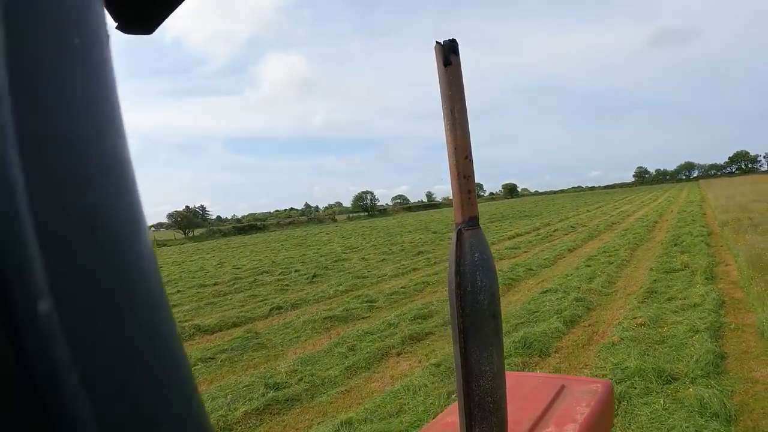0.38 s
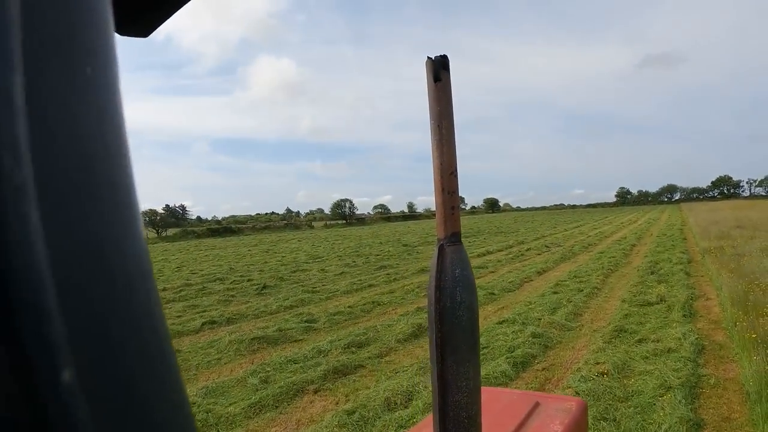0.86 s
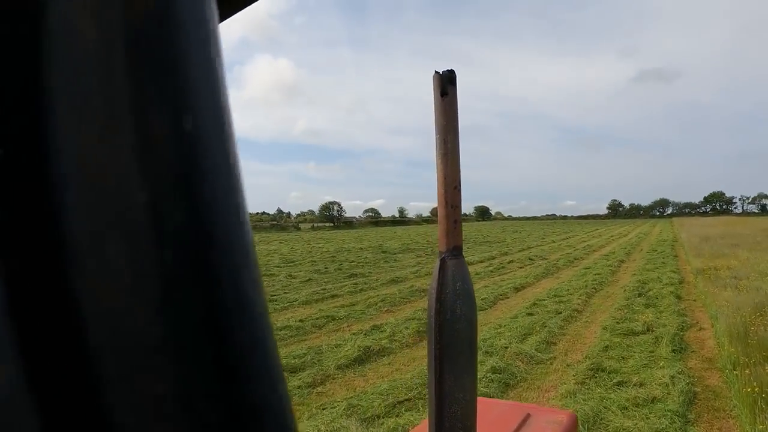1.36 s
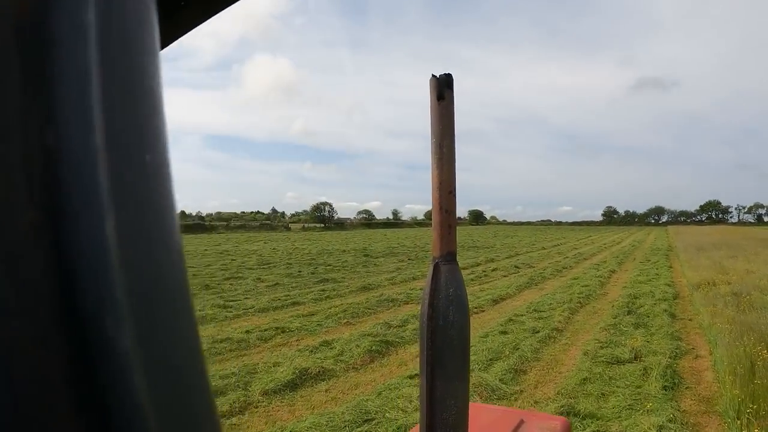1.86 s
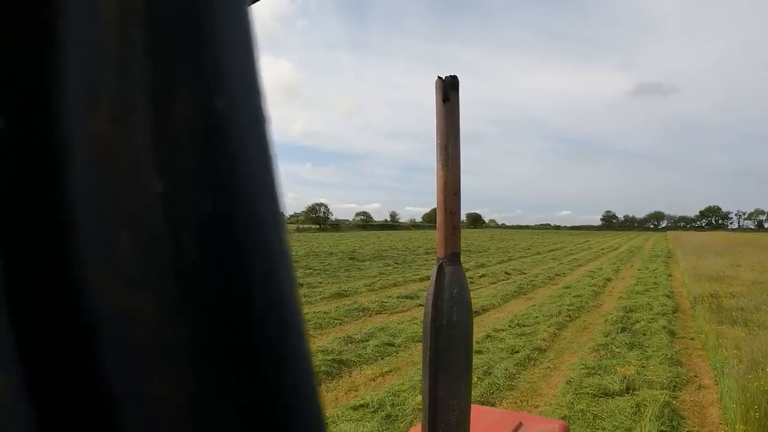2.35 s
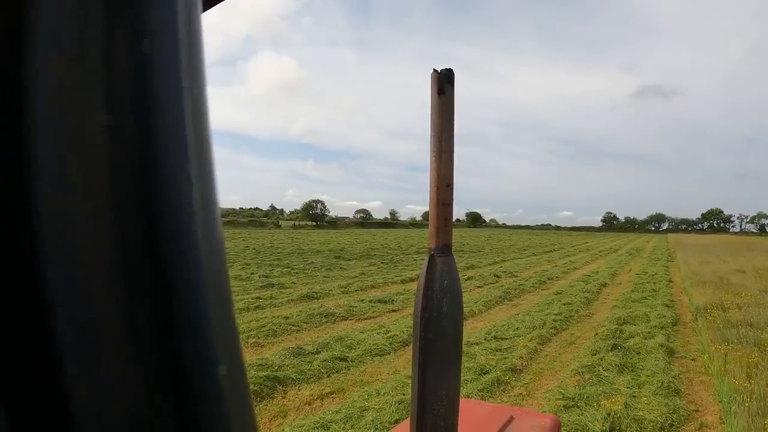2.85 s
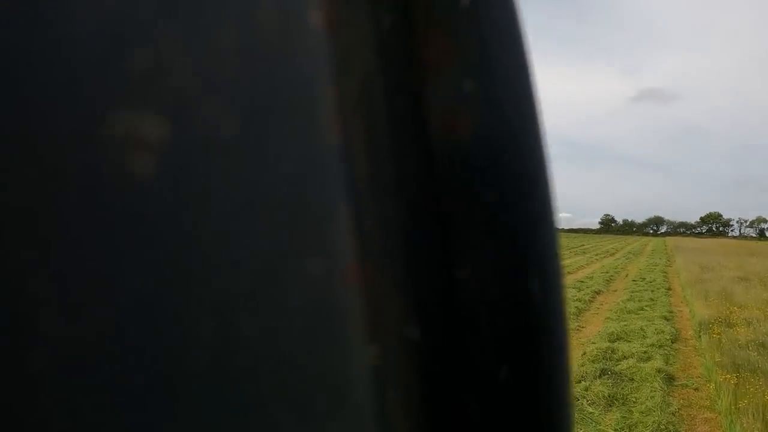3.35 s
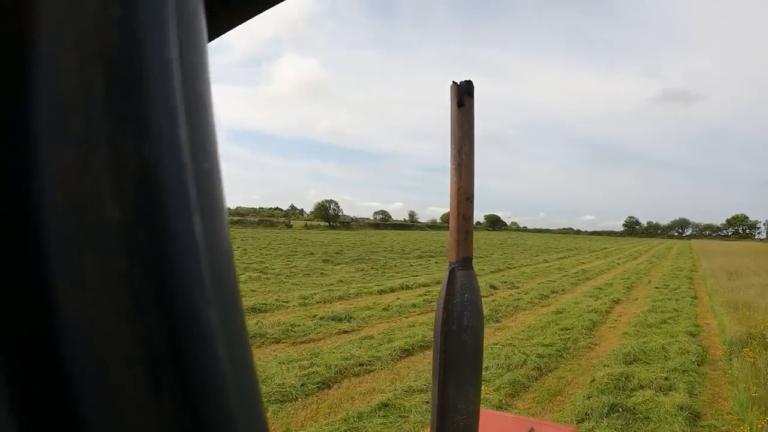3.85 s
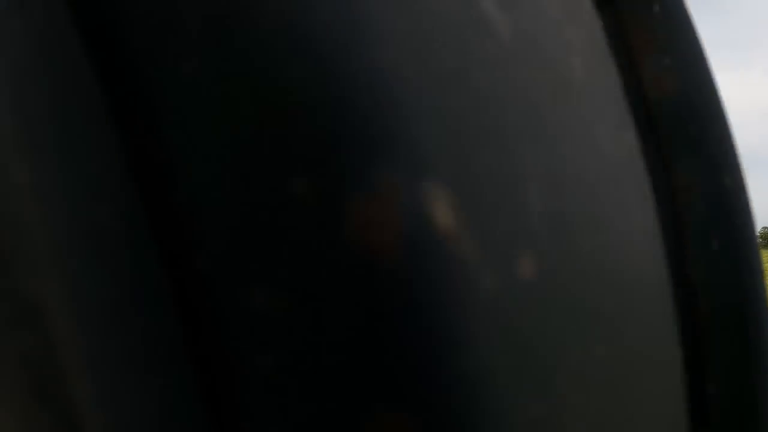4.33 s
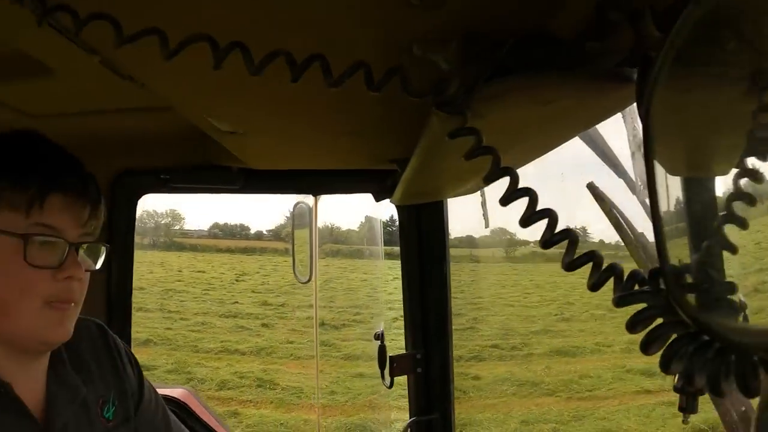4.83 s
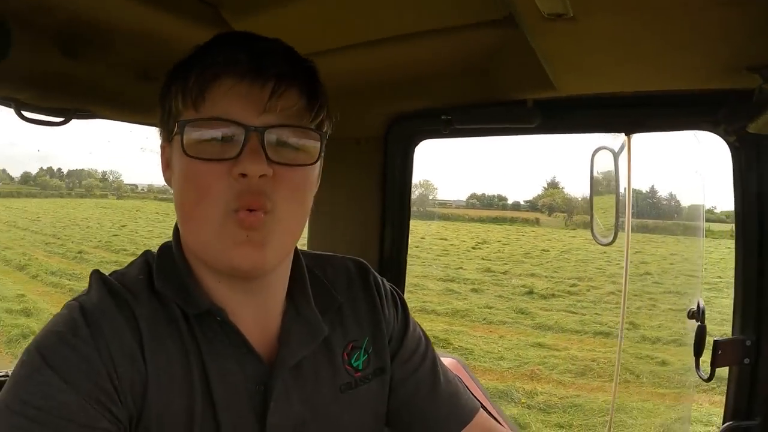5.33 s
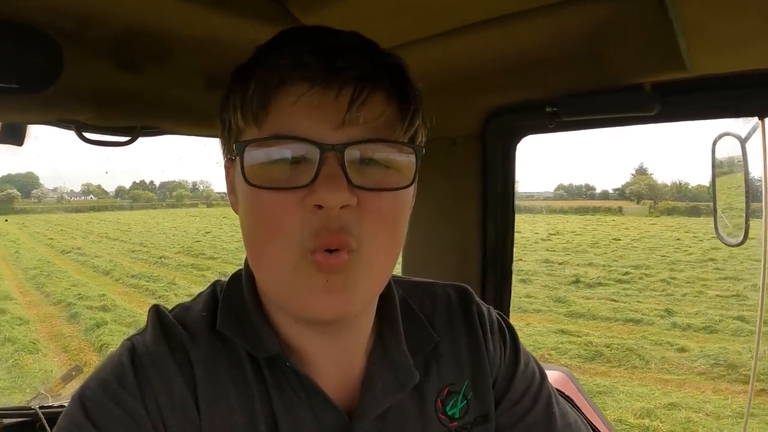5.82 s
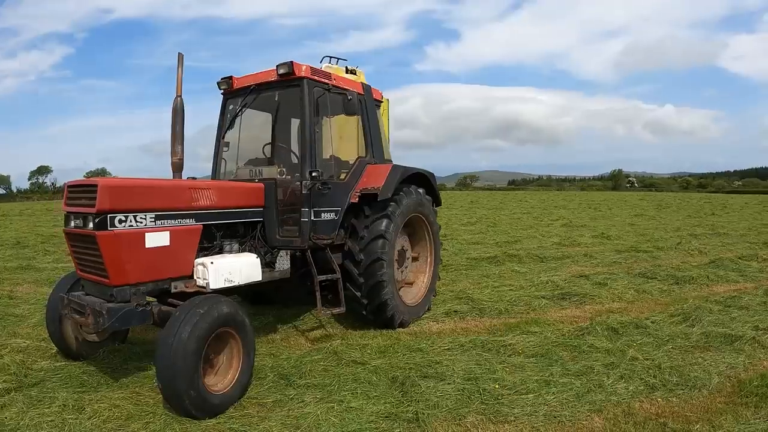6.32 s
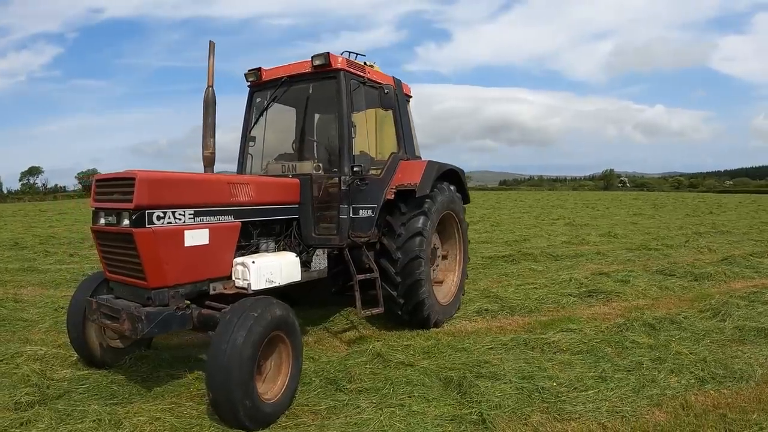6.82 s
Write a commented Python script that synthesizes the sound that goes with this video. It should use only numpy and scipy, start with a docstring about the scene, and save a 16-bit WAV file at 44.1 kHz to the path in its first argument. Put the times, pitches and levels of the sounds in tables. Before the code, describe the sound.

Outdoors in a hayfield, a loaded diesel drones hard and steady near the microphone, with rasping roar, metallic clatter and short airy exhaust whistles. A quick thump interrupts midway. Moving inside the tractor cab takes off the edge, leaving muffled roar and pulsing low mower hum. A sudden cut gives a moment of silence, then a quiet lumpy idle rises, heard from outside with light ticking.

```python
"""The firing boom, roar and stack whistle of a six-cylinder diesel tractor, driving a disc mower near 1810 rpm.
The microphone starts at the cab door near the stack, bumps the door frame, then swings into the cab, where
the stack dulls and the mower drones. Sines follow the shafts; noise flaring at each firing, shaped by
spectra and resonances, gives roar, clatter, hiss and whistle. The sound cuts to silence, then the same engine
fades in at idle, heard from outside: firing-timed noise, wavering low and middle sines, ringing valve ticks."""
import sys
import numpy as np
from scipy import signal
from scipy.fft import rfft, irfft, next_fast_len
from scipy.io import wavfile
from scipy.ndimage import uniform_filter1d, minimum_filter1d, map_coordinates

SR = 44100
rng = np.random.default_rng(int(sys.argv[2]) if len(sys.argv) > 2 else 0)


def dump_mix(stems):
    """Bounce the given channels to the path in sys.argv[1] as a 16-bit WAV at rate SR."""
    frames = np.atleast_2d(stems).T  # one column per channel
    limited = np.clip(frames, -1, 1)  # hard clip at full scale
    pcm = np.round(limited * 32767).astype(np.int16)
    wavfile.write(sys.argv[1], SR, pcm)


def voltage_ratio(level):
    """Linear amplitude factor for a level in decibels (scalar or array-like)."""
    return 10 ** (np.asarray(level, float) / 20)


N = 305783

# crank speed: t/s, speed/rpm
CRANK_SPEED = [(0.0, 1837.0), (0.4, 1823.9), (0.8, 1814.7), (1.2, 1813.2), (1.6, 1806.9), (2.0, 1805.8),
               (2.4, 1796.7), (2.8, 1808.7), (3.2, 1813.5), (3.6, 1819.4), (4.0, 1816.1), (4.4, 1822.7),
               (4.8, 1804.3), (5.2, 1816.2), (5.6, 1807.9), (6.2, 1813.2)]
# firing tone: t/s, rms level/dB
FIRING_LEVEL = [(0.2, -12), (1.0, -12.5), (3.9, -13), (4.6, -13.5), (5.2, -17), (5.8, -28.5), (6.0, -31)]
# way into the cab: t/s, cab share of the engine sounds/1, cab share of the mower drone/1 (may pass 1)
INSIDE_SHARE = [(4.2, 0.05, 0.14), (4.5, 0.1, .35), (4.75, 0.36, 0.46), (5.0, 0.37, 0.46),
                (5.4, 0.95, 0.67), (5.8, 0.96, 1.13), (6.2, 0.86, 1.26)]
# cab hiding the stack: t/s, share/1
STACK_SHADOW = [(4.17, 0.04), (4.35, 0.38), (4.55, 0.53), (4.75, 0.66), (5.0, 0.88), (5.5, 0.91),
                (6.0, 1.03), (6.18, 1)]
# multiples of the four-stroke cycle, then of the disc speed: order/1, door rms level/dB, cab rms level/dB
CYCLE_ORDERS = [(2, -50, -34), (4, -48, -38), (7, -43, -41), (8, -37, -36), (9, -43, -33), (10, -37, -28),
                (11, -46, -39), (12, -39, -31), (14, -38, -33), (15, -37, -35), (16, -42, -43),
                (18, -33.5, -46), (20, -33, -42), (21, -40, -42), (24, -36, -48), (26, -42, -46),
                (27, -41, -42), (28, -42, -44), (30, -35.5, -45), (32, -36, -49), (34, -36, -48),
                (36, -38, -47), (38, -46, -57), (40, -37, -52), (44, -47, -48), (45, -47, -43),
                (46, -50, -45), (52, -50, -46), (56, -47, -44), (60, -44, -54), (68, -55, -47),
                (75, -55, -46), (78, -55, -46)]
MOWER_ORDERS = [(1, -36, -22), (2, -36, -29), (8, -37, -39), (10, -38, -50), (14, -44, -42), (16, -44, -52)]
# orders swelling as the microphone crosses the cab's standing waves: order/1, t/s, half length/s, gain/dB
CYCLE_SWELLS = [(10, 5.62, .15, 3), (14, 5.95, .2, 5), (20, 4.95, .2, 4), (40, 5.05, .12, 7),
                (56, 5.52, .2, 11)]
MOWER_SWELLS = [(8, 5.25, .12, 4), (14, 5.85, .1, 4), (16, 4.85, .18, 11)]
# strength of each cylinder in firing order, in the exhaust and at the rim: level/dB
CYLINDERS_DB = [-4.5, -4, -4, -3.5, -5, -3.5]
RIM_CYLINDERS_DB = [-4.5, -6, -7, -2, -3.5, -3.5]
# noise spectra, door and cab: f/Hz, level/dB
ROAR_DOOR = [(10, -23), (28, -10), (60, -8), (120, -3.5), (330, -3), (430, -3.5), (520, 2.5), (575, -1.5),
             (620, -1.5), (720, -6.5), (850, -5), (1100, -7), (1300, -9), (1580, -7), (1720, -24),
             (2200, -25), (3500, -68.5)]
ROAR_CAB = [(10, -14), (28, -7.5), (75, -3.5), (130, -3), (220, -2.5), (400, -6), (600, -12), (720, -8),
            (800, -9.5), (1050, -13.5), (1250, -9.5), (1700, -19.5), (2200, -26.5), (3500, -63)]
CLATTER_DOOR = [(1000, -11), (1700, 1.5), (2190, -2.5), (2740, -0.5), (4200, -9.5), (4680, -12),
                (5530, -9.5), (6200, -31), (8060, -40), (13600, -120)]
CLATTER_CAB = [(1000, -34.5), (1700, -7), (2190, -14.5), (3290, -13.5), (4550, -16), (5500, -13),
               (6200, -20.5), (8060, -27), (13600, -120)]
COMBUSTION_TICKS = [(1000, -39), (1900, -8), (2900, -4), (3600, -1.5), (4600, -3), (5400, -18), (8000, -50)]
JET_HISS = [(3590, -32.5), (6100, -2), (6400, -1), (8300, -1), (10000, -14), (13000, -48), (22000, -120)]
SIZZLE_DOOR = [(5880, -23.5), (10000, -4), (12300, 2), (13400, -3.5), (14400, -7), (15800, -26)]
SIZZLE_CAB = [(5590, -25), (9500, -2), (10200, -19), (10900, -3.5), (12300, 6.5), (13600, 4.5), (14600, -4),
              (15800, -15.5)]
# resonances of the stack's rim: f/Hz, width/Hz, level/dB
RIM_MODES = [(5144, 40, -1), (5476, 130, -1), (5784, 180, 1.5)]
# whistle swells: start/s, length/s, level at the start before the rise/dB
WHISTLE_SWELLS = [(0.0, 0.19, -1.5), (0.211, 0.22, 3.5), (.48, 0.039, 0.5), (.63, 0.38, 2.5),
                  (1.017, 0.12, -0.5), (1.309, 0.18, -0.5), (1.523, 0.13, 0), (1.715, 0.23, 1),
                  (1.96, 0.22, -12), (2.183, 0.14, 0), (2.432, 0.074, -0.5), (2.544, 0.39, 0.5),
                  (2.946, 0.05, -7), (3.21, 0.3, -1.5), (3.56, 0.12, 0.5), (3.74, 0.2, -4),
                  (4.045, 0.036, -4.5), (4.25, 0.2, -13), (4.46, .04, -4), (4.527, 0.046, -2),
                  (4.746, 0.31, -0.5), (5.11, .05, -1.5), (5.186, 0.07, 1.5), (5.29, .06, -3.5),
                  (5.396, 0.3, 2), (5.984, 0.055, -6)]
# noise layers: level in plain view of the stack/dB, change in full shadow/dB, further change in the cab/dB
ROAR_LEVEL = (-22, -2.5, 0)
CLATTER_LEVEL = (-30.5, -10, -0.5)
JET_LEVEL = (-42, -12.5, -4.5)
SIZZLE_LEVEL = (-55.5, -15.5, 5.5)
WHISTLE_LEVEL = (-37.5, -5.5, -4)
# hollow band as the microphone turns by the door pillar: start/s, length/s, from f/Hz, to f/Hz, depth/dB
PILLAR_SWEEPS = [(.4, 1.2, 4720, 5300, 5.5), (2.2, 1, 6400, 6130, 10), (4.02, 0.8, 3600, 6300, 8),
                 (4.05, 1.3, 10000, 10300, 7), (4.2, .5, 11200, 11300, 5)]
# a sine that briefly dips the firing boom, then thumps of the door frame:
# t/s, decay level at the start before the onset ramp/dB, f/Hz, t60/s
BUMP_SINES = [(3.4328, -8, 88, .036), (3.4433, 9, 280, .014), (3.446, -13, 45, .06)]
# contact noise driving the frame: t/s, level before onset ramp and resonances/dB
FRAME_CONTACTS = [(3.421, -20), (3.429, -20), (3.435, -19), (3.4408, -2.5), (3.649, -21), (3.672, -25)]
# frame resonances, applied twice: f/Hz, width/Hz, level per pass/dB
FRAME_MODES = [(1700, 1800, 0), (3400, 1200, -3), (4800, 800, 0), (8000, 2500, -15), (12300, 2400, -11)]
# idle noise spectra: f/Hz, level/dB
IDLE_THUD = [(12, -26.5), (25, -9), (60, 0.5), (110, -3), (170, -4.5), (230, -7.5), (300, -13.5),
             (500, -73.5)]
IDLE_BODY = [(180, -45), (300, -12), (562, -13.5), (633, -8), (680, -13.5), (747, -7), (897, -16),
             (1090, -17), (1160, -11), (1250, -13), (1800, -24), (2000, -21), (2600, -41), (4400, -120)]
IDLE_CLATTER = [(1120, -32), (1900, -8), (2720, 0.5), (4880, -11.5), (5540, -13.5), (6710, -21),
                (8000, -25), (8990, -35), (12100, -38), (14000, -60)]
# idle low and middle sines: f/Hz, level over the thud layer/dB
IDLE_TONES = [(42.6, -7), (58.5, -17), (69, -8.5), (116, -15), (174, -12.5), (231, -19), (275, -24),
              (452, -24), (635, -24), (732, -20.5), (764, -24), (1168, -29)]
# idle layers: level once faded in/dB, growth/dB per s, steepness of the fade/1
THUD_LEVEL = (-25.5, 0, 4.5)
BODY_LEVEL = (-37, 13.5, 4)
IDLE_CLATTER_LEVEL = (-47.5, 12.5, 4.5)
# valve gear resonances, applied twice: f/Hz, width/Hz, level per pass/dB
ROCKER_MODES = [(5670, 220, 3), (10470, 300, -8)]
TAPPET_MODES = [(7150, 260, -0.5), (7830, 300, -4), (8700, 220, -6)]
# louder valve ticks: t/s, rocker drive/dB, tappet drive/dB (before onset ramp and resonances)
VALVE_TICKS = [(6.452, -52, -52), (6.482, -47, -45), (6.541, -47, -47), (6.57, -45, -46), (6.598, -44, -39),
               (6.627, -39, -43), (6.657, -40, -35), (6.686, -42, -40), (6.712, -29.5, -36),
               (6.742, -34, -42), (6.769, -37, -25), (6.8, -34, -38), (6.826, -36, -26), (6.857, -40, -42),
               (6.883, -31.5, -29), (6.912, -35, -40)]

DISC_TURNS_PER_CYCLE = 3.351
FIRING_START_FIRINGS, DISC_START_TURNS, PUFF_LAG_CYCLES = .45, .585, .623
CUT_S, IDLE_FADE_START_S, IDLE_FADE_TAU_S = 6.1853, 6.374, .046
IDLE_FIRING_HZ, IDLE_FIRING_START_S = 35.16, 6.4295
TIME_S = np.arange(N) / SR


def unit(x):
    """x scaled to rms 1."""
    return x / np.sqrt(np.mean(x ** 2) + 1e-20)


def curves(rows):
    """One value per sample for each column after the time."""
    s, *cols = np.transpose(rows)
    return [np.interp(TIME_S, s, c) for c in cols]


def wobble(rate_hz):
    """Smooth random curve, rate_hz knots per second."""
    knots = rng.standard_normal(int(N * rate_hz / SR) + 4)
    return map_coordinates(knots, [TIME_S * rate_hz])


def filtered(x, response):
    """x times a complex response of frequency in Hz."""
    m = next_fast_len(N + SR // 4)
    return irfft(rfft(x, m) * response(np.fft.rfftfreq(m, 1 / SR)), m)[:N]


def coloured(x, spectrum):
    """x shaped by a spectrum interpolated on a log frequency axis, rms 1."""
    f, db = np.transpose(spectrum)
    return unit(filtered(x, lambda hz: voltage_ratio(np.interp(np.log(hz + 1), np.log(f + 1), db))))


def resonant(x, modes):
    """x through parallel second-order resonances."""
    return filtered(x, lambda f: sum(voltage_ratio(db) * 1j * f * w / (c * c - f * f + 1j * f * w)
                                     for c, w, db in modes))


def patchy(patch_db):
    """White noise with patches of random gain in time and frequency."""
    z = signal.stft(rng.standard_normal(N), nperseg=512)[2]
    field = uniform_filter1d(rng.standard_normal(z.shape), 6, 0)
    field = uniform_filter1d(field, 14, 1)
    return signal.istft(z * voltage_ratio(patch_db * unit(field)), nperseg=512)[1][:N]


def bursts(firings, sharp, scatter_db, pattern_db=(0,)):
    """Noise flaring at each whole firing, each flare of its own size."""
    n = np.floor(firings + .5).astype(int)
    size_db = np.take(pattern_db, n, mode="wrap") + scatter_db * rng.standard_normal(2048)[n % 2048]
    return voltage_ratio(size_db) * np.exp(sharp * np.cos(2 * np.pi * firings)) * patchy(patch_db=1)


def tones(orders, swells, turns, inside, scatter_turns, waver_db, drift_turns):
    """Sines on shaft multiples, wavering in level; phase drift grows with order."""
    out = np.zeros(N)
    for k, door_db, cab_db in orders:
        level_db = door_db + (cab_db - door_db) * inside + waver_db * wobble(7)
        for order, s, half_s, db in swells:
            if order == k:
                level_db = level_db + db * np.exp(-((TIME_S - s) / half_s) ** 2)
        phase = k * turns + scatter_turns * rng.standard_normal() + drift_turns * k * wobble(9)
        out += np.sqrt(2) * voltage_ratio(level_db) * np.sin(2 * np.pi * phase)
    return out


def heard_db(layer, view, sway_db):
    """Layer level by shadow and cab, swaying partly in common with the other layers."""
    shadow, inside, unsteady = view
    plain_db, shadow_db, cab_db = layer
    return plain_db + shadow_db * shadow + cab_db * inside + sway_db * (.29 * unsteady + wobble(2.975))


def crossfade(inside):
    """Equal-power door and cab gains."""
    return np.sqrt(np.clip(1 - inside, 0, 1)), np.sqrt(np.clip(inside, 0, 1))


def mower(cycles, drone):
    """Discs geared to the engine drone on multiples of their speed."""
    turns = DISC_TURNS_PER_CYCLE * cycles + DISC_START_TURNS
    return tones(MOWER_ORDERS, MOWER_SWELLS, turns, drone, scatter_turns=.01, waver_db=1.2, drift_turns=.012)


def bump():
    """A brief dip in the firing boom, then frame thumps, as decaying sines; contact noise rings the frame."""
    out, tick, t = np.zeros(N), np.zeros(N), np.arange(SR // 10) / SR
    for s, db, hz, t60_s in BUMP_SINES:  # the first opposes the boom
        sine = voltage_ratio(db - 60 * t / t60_s) * np.sin(2 * np.pi * hz * t) * (1 - np.exp(-t / .0008))
        out[round(s * SR):][:len(t)] += sine
    for s, db in FRAME_CONTACTS:  # a new contact replaces the tail of the last
        decay = voltage_ratio(db - 60 * t / .012) * (1 - np.exp(-t / .0012))
        tick[round(s * SR):][:len(t)] = decay * rng.standard_normal(len(t))
    return out + resonant(resonant(tick, FRAME_MODES), FRAME_MODES)


def valve_ticks():
    """Short noise knocks ring the rockers and tappets, plus a faint broad treble snap."""
    taps, t = np.zeros((2, N + SR)), np.arange(SR // 40) / SR
    for s, *db in VALVE_TICKS:
        decay = voltage_ratio(np.c_[db] - 60 * t / .068) * (1 - np.exp(-t / .0012))
        taps[:, round(s * SR):][:, :len(t)] += decay * rng.standard_normal(len(t))
    rocker, tappet = taps[:, :N]
    snap = voltage_ratio(-25) * filtered(rocker + tappet, lambda hz: np.exp(-((hz - 9000) / 3600) ** 4))
    return (snap + resonant(resonant(rocker, ROCKER_MODES), ROCKER_MODES)
            + resonant(resonant(tappet, TAPPET_MODES), TAPPET_MODES))


def idling():
    """Slow firings drive a rough thud, body and clatter; low and middle sines waver and valves tick."""
    firings = (TIME_S - IDLE_FIRING_START_S) * IDLE_FIRING_HZ
    since_s = np.maximum(TIME_S - IDLE_FADE_START_S, 0)
    fade_db = 20 * np.log10(1 - np.exp(-since_s / IDLE_FADE_TAU_S) + 1e-6)
    thud_gain, body_gain, clatter_gain = (
        voltage_ratio(db + growth * since_s + steepness * fade_db)
        for db, growth, steepness in (THUD_LEVEL, BODY_LEVEL, IDLE_CLATTER_LEVEL))
    thud = voltage_ratio(-2) * coloured(bursts(firings - .3, sharp=.2, scatter_db=1.5), IDLE_THUD)
    hum = np.zeros(N)
    for hz, db in IDLE_TONES:
        phase = hz / IDLE_FIRING_HZ * firings + rng.random()
        hum += np.sqrt(2) * voltage_ratio(db + 2.9 * wobble(14)) * np.cos(2 * np.pi * phase)
    body = coloured(bursts(firings - .2, sharp=.12, scatter_db=.5), IDLE_BODY)
    clatter = coloured(bursts(firings, sharp=.32, scatter_db=1), IDLE_CLATTER)
    return thud_gain * (thud + hum) + body_gain * body + clatter_gain * clatter + valve_ticks()


def clattering(firings, view):
    """Knock and sharper combustion ticks at the door; blunter clatter in the cab."""
    door, cab = crossfade(view[1])
    late = firings - .59
    knock = coloured(bursts(late, sharp=.18, scatter_db=.6), CLATTER_DOOR)
    ticks = voltage_ratio(-10) * coloured(bursts(late, sharp=1.3, scatter_db=2.5), COMBUSTION_TICKS)
    dull = coloured(bursts(firings, sharp=.15, scatter_db=.9), CLATTER_CAB)
    return voltage_ratio(heard_db(CLATTER_LEVEL, view, sway_db=.3)) * (door * (knock + ticks) + cab * dull)


def stack_hiss(firings, view):
    """Gas leaving the stack hisses about a quarter firing after each pressure peak."""
    door, cab = crossfade(view[1])
    # the highest treble dips for a while after the bump
    dip = np.sqrt(np.abs(np.sin(np.pi * np.clip((TIME_S - 3.45) / .74, 0, 1))))
    jet_db = heard_db(JET_LEVEL, view, sway_db=2.3) - 3 * dip
    sizzle_db = heard_db(SIZZLE_LEVEL, view, sway_db=-1.5) - 6.5 * dip
    jet = bursts(firings - .51, sharp=.41, scatter_db=.5, pattern_db=CYLINDERS_DB)
    sizzle = door * coloured(jet, SIZZLE_DOOR) + cab * coloured(jet, SIZZLE_CAB)
    return voltage_ratio(jet_db) * coloured(jet, JET_HISS) + voltage_ratio(sizzle_db) * sizzle


def hollowed(x, width_hz):
    """x with sweeping bands cut, each starting slowly and deepest midway, and a broad lift above."""
    hz, t, z = signal.stft(x, SR, nperseg=512)
    hz, loss_db = hz[:, None], 0
    for s, length_s, from_hz, to_hz, depth_db in PILLAR_SWEEPS:
        u = np.clip((t - s) / length_s, 0, 1)
        centre_hz = from_hz + (to_hz - from_hz) * u ** 2
        hollow = np.exp(-((hz - centre_hz) / width_hz) ** 2)
        lift = .2 * np.exp(-((hz / centre_hz - 1.1) / .19) ** 2)
        loss_db = loss_db + depth_db * np.sqrt(np.abs(np.sin(np.pi * u))) * (hollow - lift)
    return signal.istft(z * voltage_ratio(-loss_db), SR, nperseg=512)[1][:N]


def whistle_swelling():
    """Whistle gain: quick swells that sag and die away over a lull."""
    rise_tau_s, fall_tau_s, sag_db_per_s, lull_db = .013, .027, 17, -9
    gain = np.full(N, voltage_ratio(lull_db))
    for s, length_s, db in WHISTLE_SWELLS:
        u = TIME_S - s
        rise = 1 - np.exp(-np.maximum(u, 0) / rise_tau_s)
        fall = np.exp(-np.maximum(u - length_s, 0) / fall_tau_s)
        gain += voltage_ratio(db - sag_db_per_s * np.clip(u, 0, 1)) * rise * fall
    return gain


def stack_whistle(firings, view):
    """Puffs across the stack's rim, near each pressure peak, ring its resonances."""
    puffs = bursts(firings - .22, sharp=.93, scatter_db=2, pattern_db=RIM_CYLINDERS_DB)
    ringing = unit(resonant(resonant(puffs, RIM_MODES), [(5350, 650, 0)]))
    return voltage_ratio(heard_db(WHISTLE_LEVEL, view, sway_db=.55)) * whistle_swelling() * ringing


def exhaust_roar(firings, view):
    """Each stroke roars with its cylinder's strength at the door; steady noise in the cab."""
    door, cab = crossfade(view[1])
    strokes = bursts(firings - .7, sharp=.09, scatter_db=1.1, pattern_db=CYLINDERS_DB)
    roar = door * coloured(strokes, ROAR_DOOR) + cab * coloured(patchy(patch_db=0), ROAR_CAB)
    return voltage_ratio(heard_db(ROAR_LEVEL, view, sway_db=.3)) * roar


def uneven_cylinders(cycles, inside):
    """Unequal cylinders: cycle orders partly in step, so one puff a cycle stands out."""
    return tones(CYCLE_ORDERS, CYCLE_SWELLS, cycles - PUFF_LAG_CYCLES, inside,
                 scatter_turns=.2, waver_db=2, drift_turns=.002)


def firing_boom(firings):
    """One sine period per firing, barely wavering."""
    return np.sqrt(2) * voltage_ratio(curves(FIRING_LEVEL)[0] + .12 * wobble(34)) * np.sin(2 * np.pi * firings)


def working():
    """Engine and mower under load, all timed by one crank."""
    cycles = np.cumsum(curves(CRANK_SPEED)[0]) / 120 / SR  # two crank turns a cycle
    firings = 6 * cycles + FIRING_START_FIRINGS
    inside, drone = curves(INSIDE_SHARE)
    view = curves(STACK_SHADOW)[0], inside, wobble(3.6)
    treble = hollowed(clattering(firings, view) + stack_hiss(firings, view), width_hz=330)
    low = mower(cycles, drone) + uneven_cylinders(cycles, inside) + firing_boom(firings)
    return low + exhaust_roar(firings, view) + treble + stack_whistle(firings, view)


def limited(x, ceiling_db=-4.3, hold_s=.042, release_s=.045, attack_s=.0009):
    """Gain control: peaks over the ceiling pull the gain down a moment late; it holds, then creeps back."""
    over_db = np.maximum(20 * np.log10(np.abs(x) + 1e-9) - ceiling_db, 1e-3)
    span = 2 * int(hold_s * SR / 2) + 1
    over_db = -minimum_filter1d(-over_db, size=span, origin=span // 2)
    # running maximum with exponential release
    rising = np.log(over_db) + TIME_S / release_s
    held_db = np.exp(np.maximum.accumulate(rising) - TIME_S / release_s)
    k = 1 / (attack_s * SR)
    return x * voltage_ratio(-signal.lfilter([k], [1, k - 1], held_db))


def scene():
    """The working tractor up to the cut, then the idling one."""
    before_cut = np.clip((CUT_S - TIME_S) / .00049, 0, 1)
    return (limited(working() + bump()) * before_cut + idling())[None]


def roll_off(x):
    """The treble ends steeply here."""
    return signal.sosfilt(signal.butter(12, 15730, fs=SR, output="sos"), x)


def record(dry):
    """A steep low-pass, amplitude halved at 16 kHz."""
    mix = filtered(dry[0], lambda hz: 1 / (1 + (hz / 16000) ** 24))[None]
    return roll_off(mix)


dry = scene()
out = record(dry)
dump_mix(out)
```